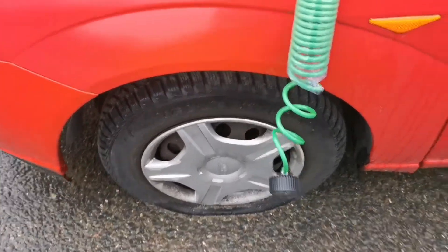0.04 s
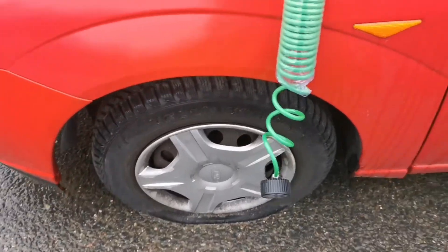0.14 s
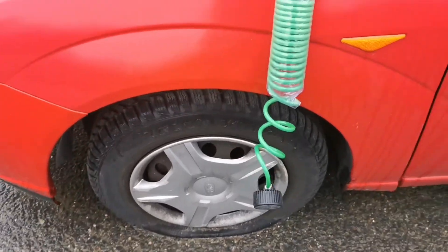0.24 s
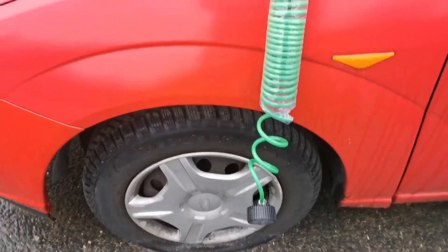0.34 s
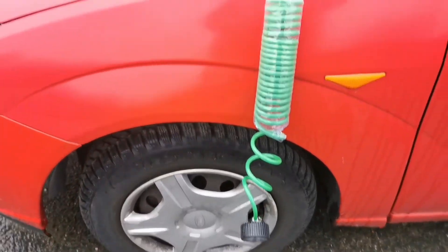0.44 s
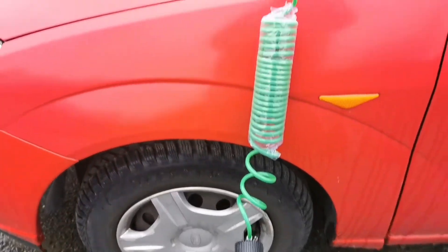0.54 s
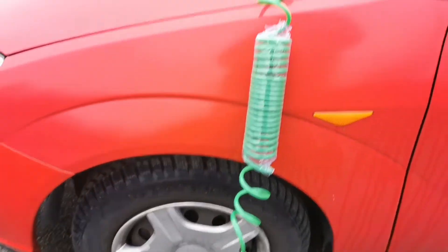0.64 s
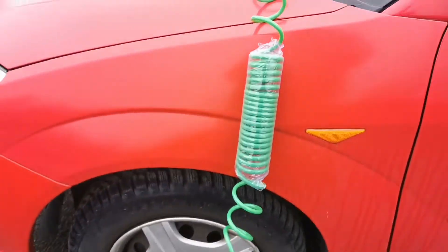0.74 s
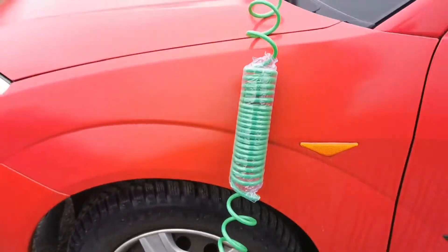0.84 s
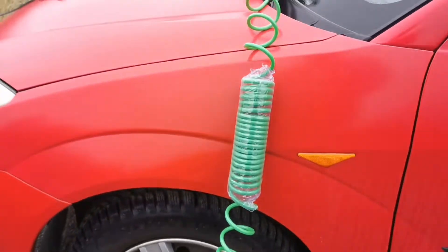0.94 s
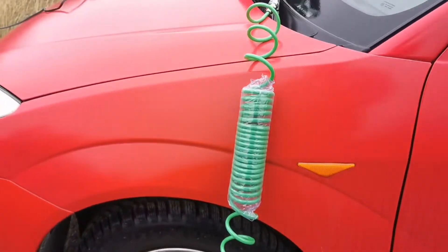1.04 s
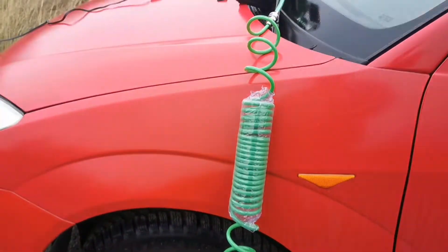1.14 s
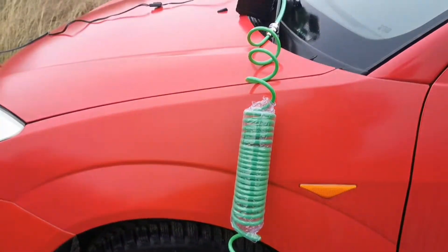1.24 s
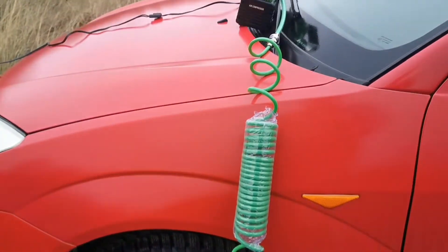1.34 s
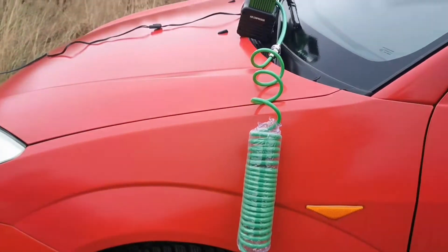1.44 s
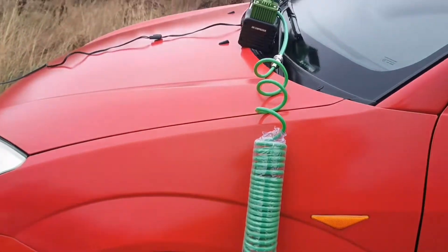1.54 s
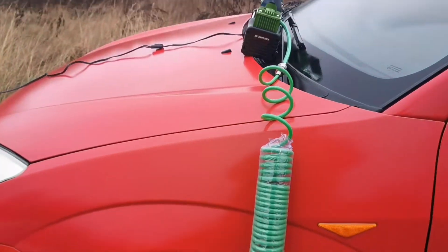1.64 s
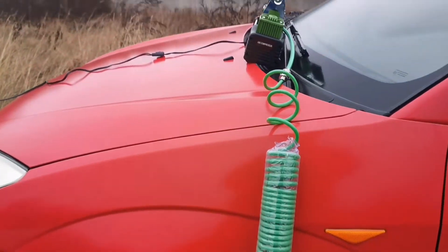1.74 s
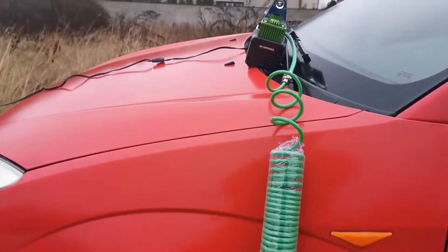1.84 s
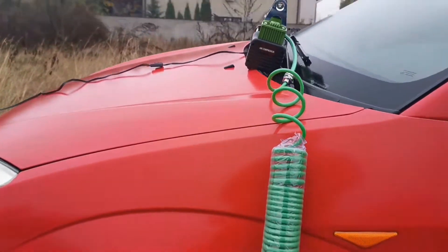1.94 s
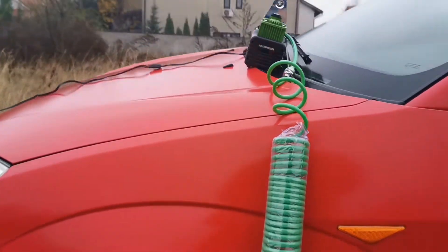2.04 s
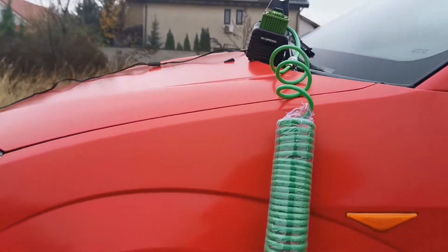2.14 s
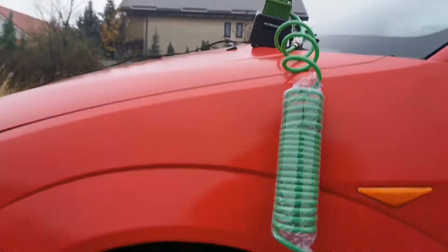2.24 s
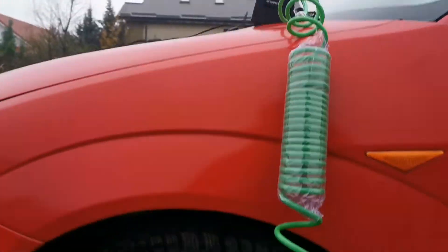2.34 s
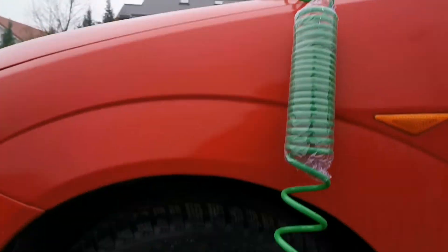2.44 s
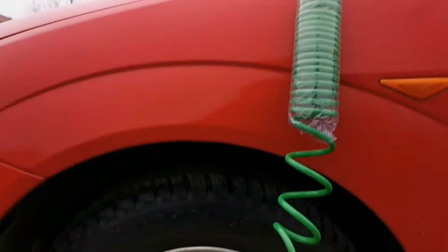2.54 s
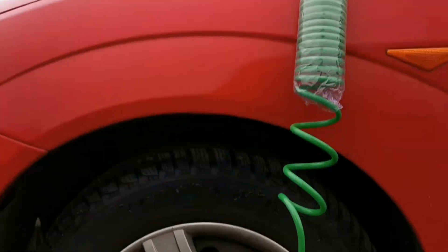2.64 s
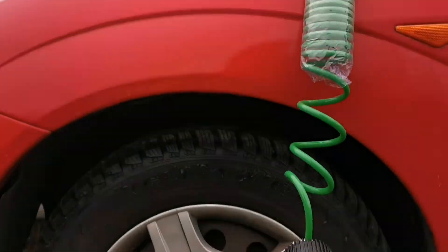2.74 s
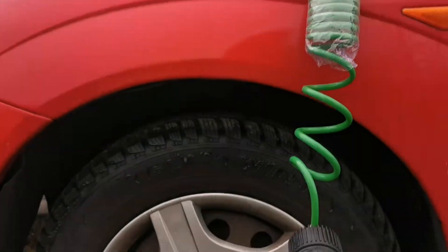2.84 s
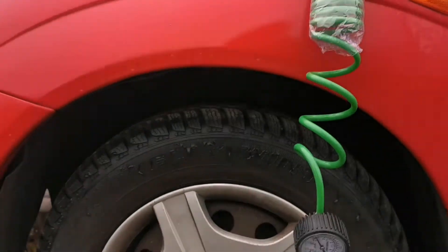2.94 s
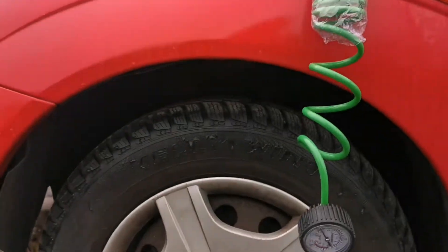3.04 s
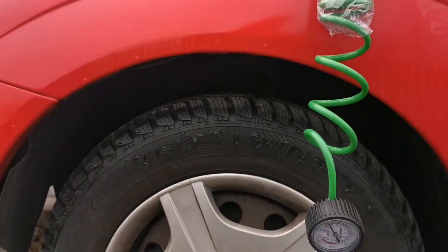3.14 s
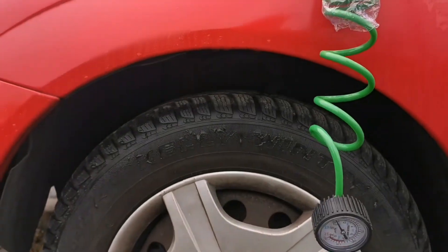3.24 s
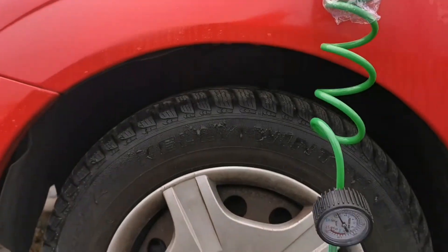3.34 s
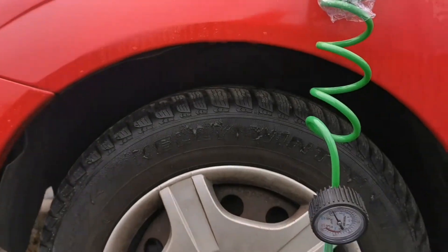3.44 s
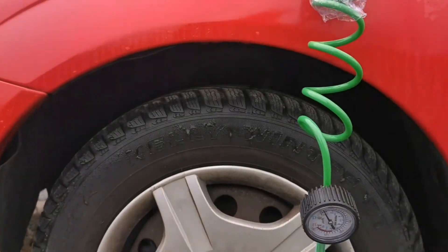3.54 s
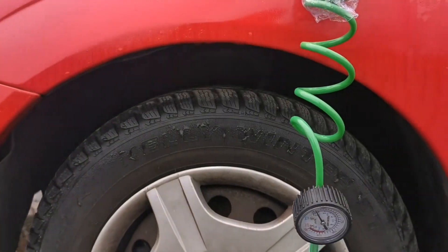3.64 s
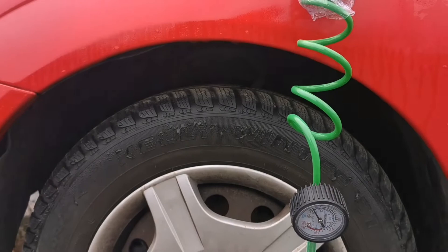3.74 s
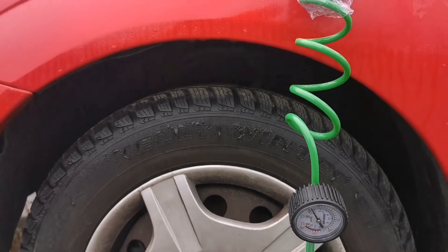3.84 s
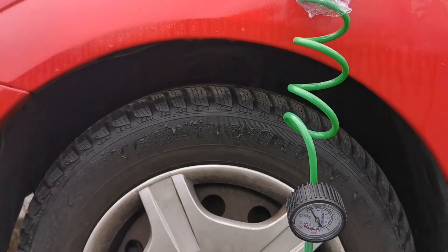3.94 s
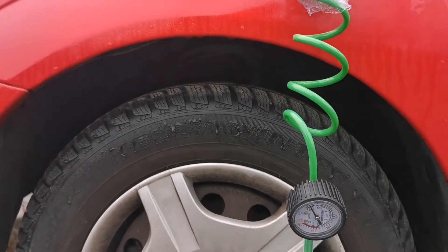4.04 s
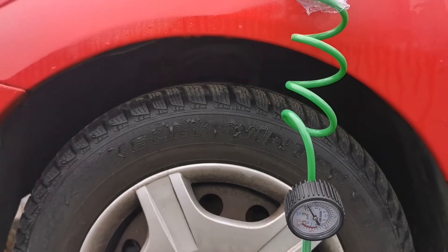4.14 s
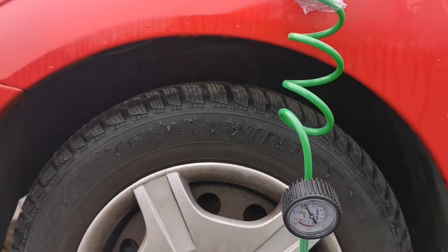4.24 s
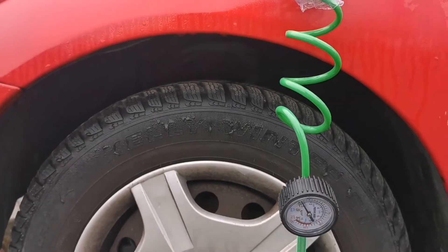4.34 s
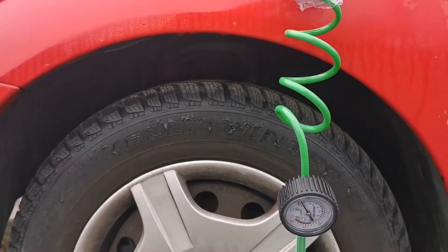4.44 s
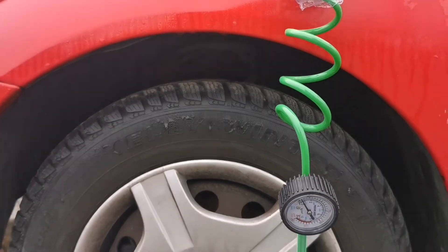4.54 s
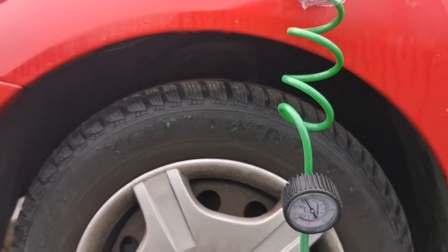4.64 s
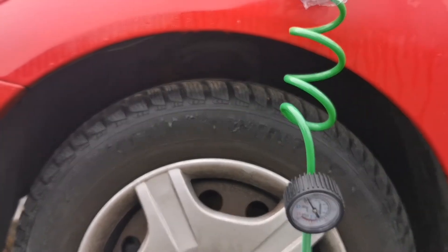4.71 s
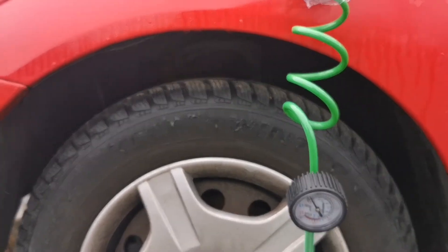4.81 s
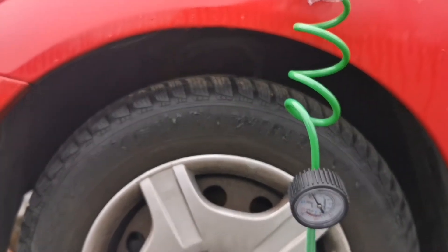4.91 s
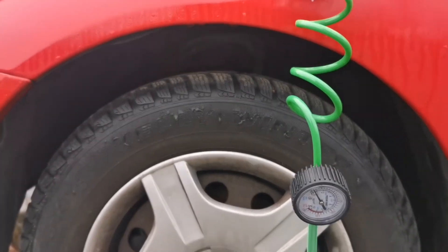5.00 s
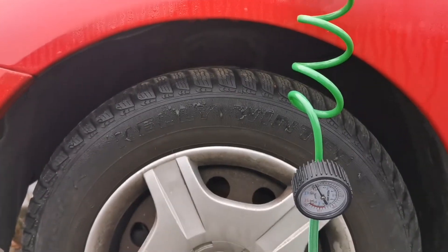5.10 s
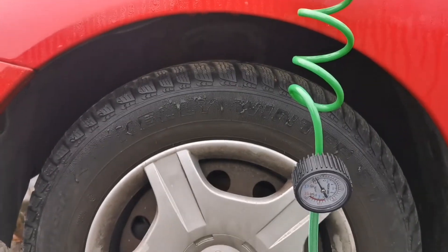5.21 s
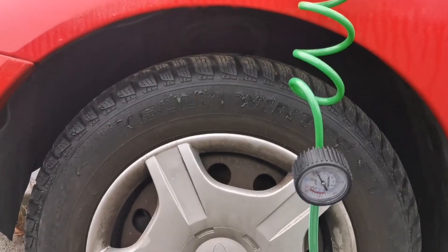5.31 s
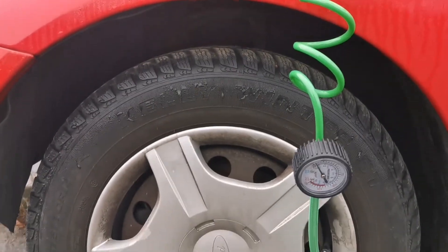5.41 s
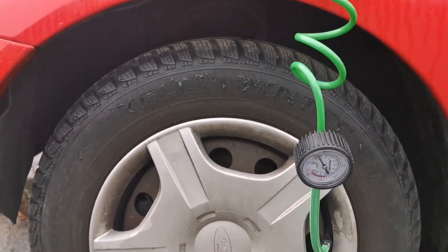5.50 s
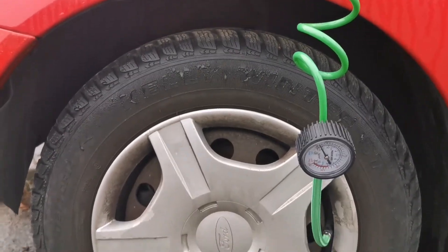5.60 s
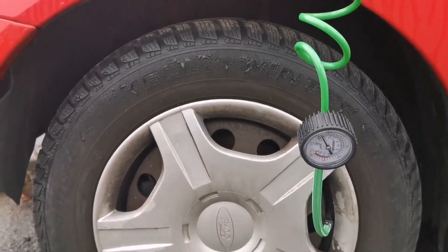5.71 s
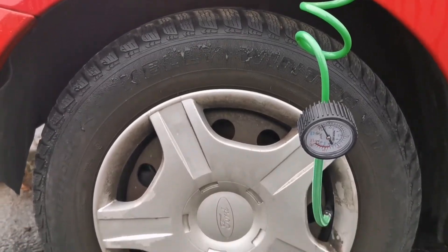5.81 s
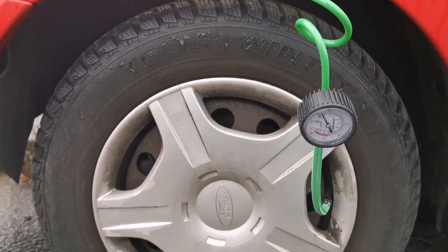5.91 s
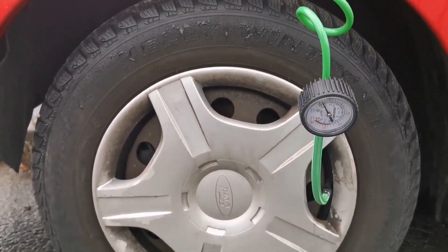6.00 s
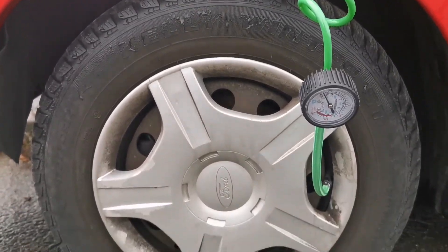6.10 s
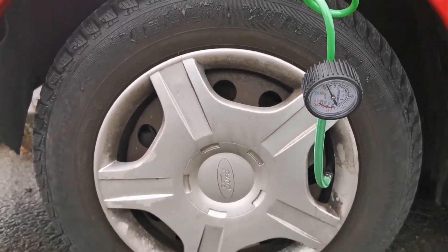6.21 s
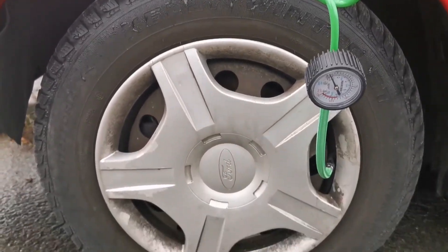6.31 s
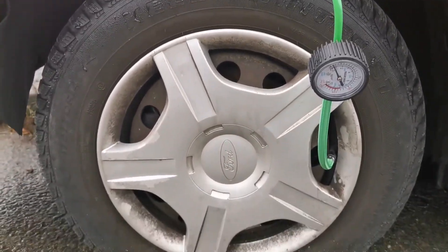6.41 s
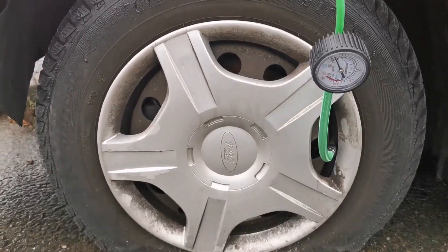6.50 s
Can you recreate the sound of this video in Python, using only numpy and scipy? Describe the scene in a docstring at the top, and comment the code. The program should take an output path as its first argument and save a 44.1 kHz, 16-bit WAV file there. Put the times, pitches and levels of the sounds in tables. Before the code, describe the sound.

A small electric piston compressor runs without pause on a car bonnet outdoors, a rough pitched hum with rapid clatter and metallic ringing. Two dull hand knocks come early. A distant car accelerates beneath it and fades. The hand-held stereo microphone moves up beside the pump, brightening valve ticks, then sinks to the wheel, where the tone turns duller and a thin air hiss passes.

```python
"""Outdoors at a car bonnet, a small piston compressor runs close to a hand-held stereo microphone,
which rises towards it and then sinks behind the wheel arch. Sine orders of the crank ring through the
sheet metal and rung reeds tick once a turn; shaped noise makes the clatter, buzz, air and leak. A distant
car accelerates as gliding sines over road roar, with light wind and three knocks of the hand.
"""
import sys
import numpy as np
from scipy import signal
from scipy.io import wavfile
from scipy.ndimage import uniform_filter1d

SR = 44100
rng = np.random.default_rng(int(sys.argv[2]) if len(sys.argv) > 2 else 0)


def transcribe(signal):
    """Save signal, clipped to [-1, 1], as a 16-bit WAV file at the path in sys.argv[1]."""
    frames = np.atleast_2d(signal).T
    limited = np.clip(frames, -1, 1)
    pcm = np.round(limited * 32767).astype(np.int16)
    wavfile.write(sys.argv[1], SR, pcm)


N = 289282
T = np.arange(N) / SR  # s

# crank speed, sagging as the tyre fills: start_s, speed_turns_per_s
SPEED = [(0.0, 44.649), (1.2, 44.607), (2.4, 44.618), (3.6, 44.538), (5.0, 44.438), (6.56, 44.414)]
# microphone path, 0 beside the wing, 1 level with the bonnet, 2 down at the wheel, as heard in three
# parts of the sound: start_s, low_orders_place, upper_orders_place, valves_place
PLACE = [(0, 0.25, 0.12, .05), (.5, 0.17, 0.13, .05), (.85, 0.51, 0.6, 0.73), (1.1, 0.74, 1.1, 1),
         (1.7, 1.12, 1.01, 1.02), (2.15, 1.22, 1.46, 1.06), (2.6, 1.3, 1.83, 1.24), (3., 1.63, 1.86, 1.47),
         (3.5, 2, 1.82, 1.64), (6.56, 2.05, 2.34, 1.6)]
# stereo balance over the spectrum: pitch_hz, left_minus_right_db
BALANCE_DB = [(60, 3), (110, 4), (200, 3), (380, 1), (700, -3.5), (1290, 0), (2380, -7), (4400, 2.5),
              (8120, 0.5), (15000, -4.5)]


def amp(db):
    """Amplitude factor of a level in dB."""
    return 10 ** (np.asarray(db) / 20)


def evened(x):
    """Scales a signal to rms 1."""
    return x / np.sqrt(np.mean(x ** 2) + 1e-20)


def read(points, hz):
    """Reads a table along a logarithmic frequency axis."""
    f, value = np.transpose(points)
    return np.interp(np.log(hz + 1), np.log(f + 1), value)


def curves(rows, t):
    """Reads every column of a table by straight lines along its first column."""
    s, *columns = np.transpose(rows)
    return np.array([np.interp(t, s, column) for column in columns])


def bump(t, s, half_s):
    """A bell of height 1 centred at s."""
    return np.exp(-((t - s) / half_s) ** 2)


def by_place(values, t, axis=0):
    """Blends the values of the three places along one column of the microphone path."""
    return np.interp(curves(PLACE, t)[axis], range(3), values)


def place_weights(place):
    """Shares of wing, bonnet and wheel at each point of the path."""
    return [np.maximum(1 - abs(np.clip(place, 0, 2) - p), 0) for p in range(3)]


def drift(t, top_hz, count):
    """Slow random wanders, sums of 16 sines, of rms 1 together."""
    hz = np.geomspace(.15, top_hz, 16)[:, None]
    start = rng.random((count, 16, 1))
    return evened((np.sin(2 * np.pi * (hz * t + start)) / np.sqrt(hz)).sum(1))


def noise(spectrum, tilt_db, patchy_db):
    """Stereo noise with drifting patches, of rms 1 before tilt_db per octave slopes it above 2 kHz."""
    # likeness of the two channels: pitch_hz, likeness_share
    likeness = [(60, 0.48), (180, 1), (550, 0.36), (1650, 0.17), (4970, 0.1), (15000, 0.033)]
    frames, hz = N // 256 + 5, np.fft.rfftfreq(1024, 1 / SR)
    a, b, c, d, patches = rng.standard_normal((frames, 513, 5)).T
    smooth = uniform_filter1d(patches, size=10, axis=0)
    patches = evened(uniform_filter1d(smooth, size=16, axis=1))

    same = np.clip(read(likeness, hz), 0, 1)[:, None]
    left = a + 1j * b
    right = same * left + np.sqrt(1 - same ** 2) * (c + 1j * d)
    lean = read(BALANCE_DB, hz)[:, None] / 2
    level_db = read(spectrum, hz)[:, None] + patchy_db * patches
    z = np.array([left, right]) * amp(level_db + np.array([lean, -lean]))

    tilt = np.interp(np.arange(frames) * 256 / SR, T, tilt_db + 0 * T)
    octaves = np.log2(np.maximum(hz, 2000) / 2000)[:, None]
    flat = signal.istft(z, nperseg=1024, noverlap=768)[1]
    tilted = signal.istft(z * amp(tilt * octaves), nperseg=1024, noverlap=768)[1]
    return tilted[:, :N] / np.std(flat)


def dip(hz, t):
    """Gain in dB of a band that a reflection cancels, sliding as the microphone moves."""
    # the sliding band: start_s, pitch_hz, gain_db, width_hz
    slide = [(0, 1520, -14, 90), (.2, 1520, 0, 90), (.5, 1520, 0, 90), (.86, 1520, 4, 90),
             (1.05, 1520, 0, 90), (1.62, 1680, 0, 80), (1.74, 1540, -18, 80), (1.9, 1320, -16, 70),
             (2.08, 1080, -9, 70), (2.22, 715, -5, 45), (2.34, 700, -4, 35), (2.45, 450, -4, 25),
             (2.62, 490, -11, 25), (2.78, 500, -9, 25), (2.93, 540, -6, 25), (3.1, 580, -11, 25),
             (3.3, 625, -4, 25), (3.6, 680, 0, 25), (6.56, 680, 0, 25)]
    dip_hz, dip_db, width_hz = curves(slide, t)
    away = (hz - dip_hz) / width_hz
    # a band 3.8 widths higher moves the opposite way by a smaller share
    return dip_db * (bump(away, 0, 1) - 0.22 * bump(away, 3.8, 3.1))


def reflected(x):
    """Passes a pump noise through a softened copy of the sliding dip."""
    hz, t, z = signal.stft(x, SR, nperseg=1024)
    return signal.istft(z * amp(0.38 * dip(hz[:, None], t)), SR, nperseg=1024)[1][:, :N]


def crank():
    """Crank angle in turns, the running sum of the speed."""
    return np.cumsum(curves(SPEED, T)[0]) / SR


def crank_levels(t):
    """Level in dB of each crank order, coloured by the sheet metal near the microphone."""
    # orders heard beside the wing, level with the bonnet, down at the wheel: multiple, relative_level_db
    wing, bonnet, wheel = [(1, -13), (2, -12), (3, -25), (4, -8), (5, -7.5), (6, -17), (7, -15), (8, -14),
                           (9, -33), (10, -11.5), (11, -5.5), (12, -19), (13, -1.5), (14, -2), (15, -10),
                           (16, 4), (17, -11.5), (18, -22.5), (19, -43), (20, -33), (21, -25), (22, -13.5),
                           (23, -23), (24, -16), (25, -25), (26, -51), (27, -15), (28, -25), (29, -10.5),
                           (30, -11), (31, -11.5), (32, -14), (33, -2), (34, -14), (35, -3.5), (36, -15),
                           (37, -9), (38, -11), (39, -33), (40, -17), (41, -39), (42, -12), (43, -22),
                           (44, -20), (45, -46), (46, -32), (47, -26), (48, -46), (49, -21.5), (50, -43)], [(1, -16.5), (2, -9), (3, -16.5), (4, -14), (5, -5.5), (6, -14),
                                         (7, -20), (8, -28), (9, -29), (10, -7.5), (11, -3), (12, -9),
                                         (13, 2.5), (14, -4.5), (15, -8.5), (16, 1.5), (17, -13.5),
                                         (18, -15.5), (19, -44), (20, -21), (21, -16), (22, -13.5),
                                         (23, -13), (24, -3.5), (25, -16.5), (26, -43), (27, -5), (28, -14),
                                         (29, -9), (30, -13.5), (31, -10), (32, -54), (33, -6.5),
                                         (34, -26.5), (35, -7), (36, -58), (37, -15), (38, -35), (39, -52),
                                         (40, -38), (41, -74), (42, -73), (43, -58), (44, -19.5), (45, -20),
                                         (46, -22), (47, -16), (48, -29), (49, -15.5), (50, -15)], [(1, -15.5), (2, -10.5), (3, -13.5), (4, -10),
                                                         (5, -22), (6, -26.5), (7, -31), (8, -77), (9, -20),
                                                         (10, -4.5), (11, -10), (12, -13.5), (13, 2.5),
                                                         (14, -8), (15, -22), (16, -6.5), (17, -15),
                                                         (18, -19), (19, -41), (20, -28), (21, -17),
                                                         (22, -14), (23, -17.5), (24, -15), (25, -75),
                                                         (26, -29), (27, -59), (28, -16), (29, -23),
                                                         (30, -18), (31, -16.5), (32, -49), (33, -16),
                                                         (34, -26), (35, -20.5), (36, -19), (37, -34),
                                                         (38, -54), (39, -61), (40, -25), (41, -55),
                                                         (42, -37), (43, -47), (44, -50), (45, -36),
                                                         (46, -48), (47, -28), (48, -23), (49, -31),
                                                         (50, -40)]
    # level added to the orders at the three places: level_db
    place_db = [-32, -33.5, -31]
    # hum around the 13th order, swelling as the microphone crosses the panel's pattern: start_s, lift_db
    hum = [(0, 6.5), (.15, 2), (1.6, 2), (2.25, 7.5), (2.8, 0.5), (3.4, -2.5), (4.6, -1), (6.56, 1)]
    hum_hz, hum_width_hz = 575, 120
    last_low_order = 19

    low, upper = [place_weights(place) for place in curves(PLACE, t)[:2]]
    hum_db = curves(hum, t)[0]
    levels = {}
    for k in range(1, len(wing) + 1):
        weights = upper if k > last_low_order else low
        heard = zip(weights, (wing, bonnet, wheel), place_db)
        level_db = sum(w * (table[k - 1][1] + db) for w, table, db in heard)
        hz = k * SPEED[0][1]
        levels[k] = level_db + dip(hz, t) + hum_db * bump(hz, hum_hz, hum_width_hz)
    return levels


def mesh_levels(t):
    """Level in dB of each gear mesh order, a whine that briefly swells or sinks."""
    # gear mesh orders: multiple, relative_level_db
    mesh = [(57, -6.5), (65, -3.5), (67, -3.5), (68, -78), (69, 2.5), (70, 1), (71, -16.5), (72, -13)]
    # level added to the mesh orders at the three places: level_db
    mesh_db = [-54, -54, -56.5]
    # brief swells and sinks of the whine: centre_s, lift_db, half_length_s
    whines = [(.3, 6.5, .22), (1.7, 3, .1), (2.1, 4, .12), (2.76, 3.5, .1), (3.15, -5, .25), (4.7, 2, 0.3)]
    whine_db = by_place(mesh_db, t) + sum(db * bump(t, s, half_s) for s, db, half_s in whines)
    return {k: db + whine_db for k, db in mesh}


def orders(turns):
    """Sines at multiples of the crank speed, wavering in level, phase and stereo place."""
    # moment each range of orders is struck, by its first order, as successive delays:
    # multiple, delay_from_above_turns, delay_from_wheel_turns
    struck = [(1, .44, .45), (3, .42, .3), (4, .4, .85), (8, .45, .8), (9, .55, .3), (10, .55, .8),
              (11, .2, .2), (13, .85, .85), (15, .62, .4), (17, 1, .85), (24, 1.25, 1.2), (30, 1, .95),
              (38, 1, 1), (44, 1.5, 1.5), (50, 1.5, 1.5), (64, 1, 1)]
    # how much the orders wander: pitch_hz, wander_share
    scatter_table = [(100, 0.12), (720, 0.06), (1000, 0.62), (1600, 0.23), (2200, 0.93), (4000, 0.76)]
    # share of that wander kept by the crank orders at the three places: wander_share
    place_wander = [1., .9, .55]
    # the wheel arch shades the left side: pitch_hz, left_minus_right_db
    arch = [(400, 0.3), (580, -2.5), (720, 2.1), (1300, -3.5), (1600, -2)]
    mesh_flutter = 1.5  # the mesh orders waver more

    t = T[::200]
    crank_db = crank_levels(t)
    level = {**crank_db, **mesh_levels(t)}
    at_wheel = place_weights(curves(PLACE, t)[0])[2]

    multiples = np.arange(1, max(level) + 1)
    # each blow adds to the delay of the order before
    above, below = np.cumsum(curves(struck, multiples), axis=1)
    shortest_way = (below - above + .5) % 1 - .5
    late = above[:, None] + shortest_way[:, None] * at_wheel

    wanders = drift(t, 9., count=4 * len(multiples))
    waver, sway, twist, slip = wanders.reshape(4, len(multiples), -1)
    out = np.zeros((2, N))
    for k, db in level.items():
        hz, i = k * SPEED[0][1], k - 1
        share = by_place(place_wander, t) if k <= len(crank_db) else mesh_flutter
        scatter = read(scatter_table, hz) * share

        phase = .25 * scatter * slip[i] - 2 * np.pi * late[i]
        mid = np.sqrt(2) * amp(db + 1.66 * scatter * waver[i]) * np.exp(1j * phase)
        half_balance_db = (read(BALANCE_DB, hz) + at_wheel * read(arch, hz)) / 2
        apart = amp(half_balance_db + 3.6 * scatter * sway[i]) * np.exp(.45j * scatter * twist[i])
        # offset the change that the spread makes to the sum of the channels
        mid = mid * 2 / abs(apart + 1 / apart + 0.24)

        spin = np.exp(2j * np.pi * k * turns)
        for channel, side in enumerate((apart, 1 / apart)):
            out[channel] += (np.interp(T, t, mid * side) * spin).real
    return out


def valves(turns):
    """One slightly uneven tick a turn rings each valve reed as a decaying sine."""
    # valve reeds: pitch_hz, width_hz, moment_turns, wing_level_db, bonnet_level_db, wheel_level_db
    reeds = [(4070, 26, 0.3, -56, -56, -68), (5520, 46, .1, -70, -53, -71),
             (6320, 43, 0.69, -73, -48.5, -69), (8980, 45, 0.68, -59, -62, -74)]
    out, t = np.zeros((2, N)), np.arange(1500) / SR
    for hz, width_hz, moment, *place_levels in reeds:
        at = np.flatnonzero(np.diff(np.floor(turns - moment)))
        luck = rng.standard_normal((len(at), 3))
        decay = np.exp(-np.pi * width_hz * t)
        attack = 1 - np.exp(-t / 0.00028)
        ring = decay * attack * np.sin(2 * np.pi * hz * t)
        level = amp(by_place(place_levels, T, axis=2))
        jitter = np.round(.45 * luck[:, 0]).astype(int)  # samples
        for channel in range(2):
            ticks = np.zeros(N)
            # the right channel follows one sample later
            when = np.clip(at + jitter + channel, 0, N - 1)
            ticks[when] = amp(1.8 * luck[:, 1 + channel])
            out[channel] += level * evened(signal.oaconvolve(ticks, ring)[:N])
    return out


def clatter(turns):
    """Noise of the rattling mechanism, a little louder at both ends of the stroke."""
    # spectrum: pitch_hz, density_db_per_hz
    spectrum = [(300, -7), (600, 2.5), (870, -3.5), (1150, 0.5), (1450, 1.5), (2200, 0.5), (2600, -6),
                (3050, -3), (3500, -7), (5500, -10.5), (7500, -17), (10000, -26.5), (16000, -52)]
    # level before the treble slope: start_s, level_db
    level = [(0, -36), (.3, -37.5), (4.9, -36), (5.5, -40), (6.1, -38), (6.56, -41)]
    # treble slope at the three places, duller as the wheel arch hides the pump: slope_db_per_octave
    dulling = [2.5, 1.6, -2]
    stroke = 1 + 0.11 * np.exp(3.5 * (np.cos(4 * np.pi * (turns - .33)) - 1))
    rattle = noise(spectrum, by_place(dulling, T), patchy_db=1.35)
    return amp(curves(level, T)[0]) * evened(stroke) * rattle


def buzz():
    """The bonnet buzzes under the pump as a band of patchy noise."""
    # spectrum: pitch_hz, density_db_per_hz
    spectrum = [(850, -34), (1050, -1), (1300, -2), (1500, 11.5), (1700, -31), (1900, -46.5)]
    # level at the three places: level_db
    level = [-37.5, -43.5, -48.5]
    return amp(by_place(level, T)) * noise(spectrum, 0, patchy_db=-2.2)


def air(turns):
    """Hiss through intake and hose, with one puff on intake and one on delivery each turn."""
    # spectrum: pitch_hz, density_db_per_hz
    spectrum = [(5000, -27), (8000, -3.5), (11200, 2), (12500, 0), (14000, -0.5), (16000, -4)]
    # level: start_s, level_db
    level = [(0, -62.5), (2.2, -53.5), (3.25, -54), (3.8, -55.5), (4.5, -57), (5.9, -55.5), (6.56, -57)]
    puffs = 1 + 0.51 * np.exp(2.5 * (np.cos(4 * np.pi * (turns - .36)) - 1))
    return amp(curves(level, T)[0]) * evened(puffs) * noise(spectrum, 0, patchy_db=2.0)


def traffic():
    """A distant car: wavering engine orders gliding upward over the roar of the road."""
    # engine: start_s, firing_cycle_hz, level_db
    car = [(0, 36.8, -43), (.45, 36.7, -38), (.62, 39.3, -54), (1.2, 43.7, -44), (1.55, 44.7, -58),
           (1.7, 45.9, -41.5), (2.1, 48.9, -51), (2.6, 53.4, -51), (2.8, 53, -57), (3.2, 54, -80)]
    # engine orders: multiple, relative_level_db, growth_db_per_s
    car_orders = [(2, -11, 2.5), (3, 0, 0), (4, -11, 0)]
    # road roar spectrum: pitch_hz, density_db_per_hz
    roar_spectrum = [(20, -22), (40, -16), (100, -7), (220, 1.5), (350, -3.5), (600, -8), (1200, -28.5)]
    # road roar level: start_s, level_db
    roar_level = [(0, -40), (2, -43.5), (3.5, -50), (6.56, -64)]
    hz, level_db = curves(car, T)
    cycles, t = np.cumsum(hz) / SR, T[::200]
    wavers = drift(t, 3.34, count=len(car_orders))
    engine = np.zeros(N)
    for (k, db, growth_db), waver in zip(car_orders, wavers):
        order_db = level_db + db + growth_db * np.minimum(T, 3) + 1.5 * np.interp(T, t, waver)
        engine += np.sqrt(2) * amp(order_db) * np.sin(2 * np.pi * k * cycles)
    roar = amp(curves(roar_level, T)[0]) * noise(roar_spectrum, 0, patchy_db=0.1)
    return engine * amp([[1.6], [-1.6]]) + roar  # the engine leans left


def wind():
    """Light wind on the microphone as patchy low noise."""
    # spectrum: pitch_hz, density_db_per_hz
    spectrum = [(15, -13), (31, 1), (42, -2), (62, -8), (90, -21)]
    return amp(-52.5) * noise(spectrum, 0, patchy_db=6.0)


def knocks():
    """The hand knocks the microphone housing: short dull rings, the first with a noisy slap."""
    # knocks: start_s, ring_level_db, ring_hz, ring_t60_s, slap_level_db
    hits = [(.506, -21, 300, .03, -33.5), (.588, -21, 155, .09, -70), (2.35, -28, 78, .15, -70)]
    out, t = np.zeros(N), np.arange(8000) / SR
    body = signal.butter(2, [350, 1250], "bandpass", fs=SR, output="sos")
    for s, db, hz, t60, slap_db in hits:
        attack = 1 - np.exp(-t * hz)
        ring = amp(db - 60 * t / t60) * np.sin(2 * np.pi * hz * t) * attack
        burst = amp(slap_db - 60 * t / .03) * rng.standard_normal(len(t))
        click = 150 * amp(slap_db) * (t == t[60])  # one sample, 60 samples in
        slap = .6 * burst + signal.sosfilt(body, 16 * burst - click)
        out[round(s * SR):][:len(t)] += ring + slap
    return out


def leak():
    """Air hisses in a narrow band at the hose coupling as the microphone passes, throbbing at random."""
    # swells of the hiss: centre_s, level_db, half_length_s
    leaks = [(3.25, -52, 0.24), (4.7, -63, 1)]
    jet = [(8500, -40), (10000, -8), (10800, 0), (11600, -7), (13500, -40)]  # pitch_hz, density_db_per_hz
    swell = sum(amp(db) * bump(T, s, half_s) for s, db, half_s in leaks)
    return swell * noise(jet, 0, patchy_db=1.5)


def scene():
    """The pump close by, with the distant car, the wind and the hand around it."""
    turns = crank()
    rattle = reflected(clatter(turns) + buzz())
    pump = orders(turns) + valves(turns) + rattle + air(turns) + leak()
    return pump + traffic() + wind() + knocks()


def record(dry):
    """The band limit: a steep low-pass at 15750 Hz."""
    low_pass = signal.firwin(1023, 15750, window=("kaiser", 9), fs=SR)
    return signal.oaconvolve(dry, low_pass[None], "same")


dry = scene()
out = record(dry)
transcribe(out)
```